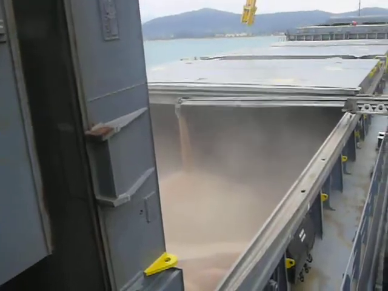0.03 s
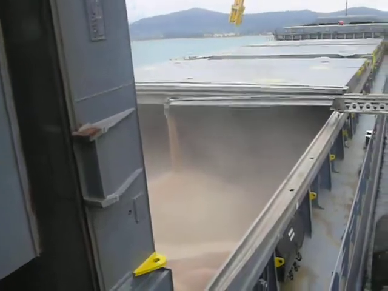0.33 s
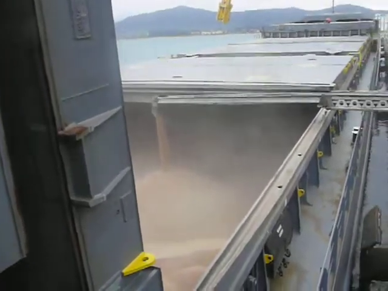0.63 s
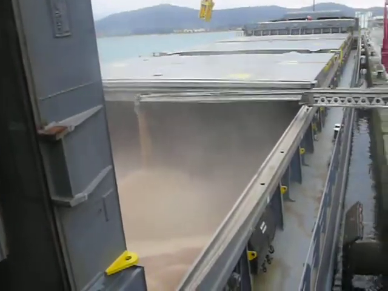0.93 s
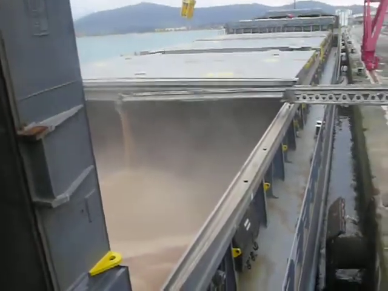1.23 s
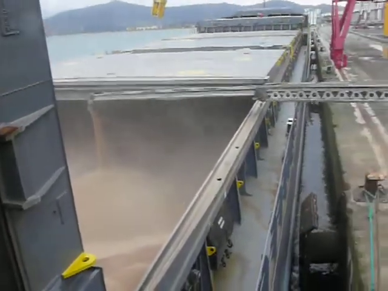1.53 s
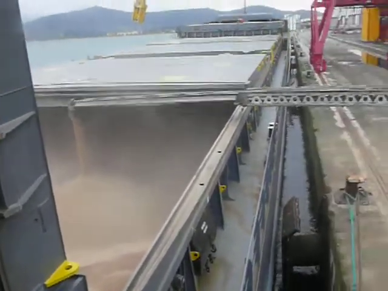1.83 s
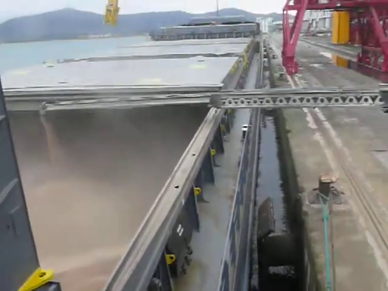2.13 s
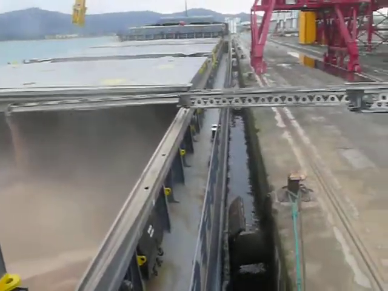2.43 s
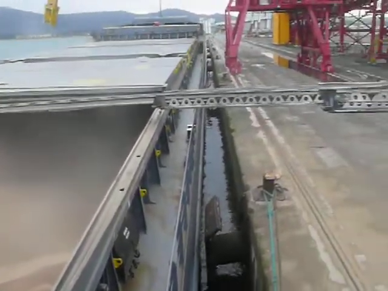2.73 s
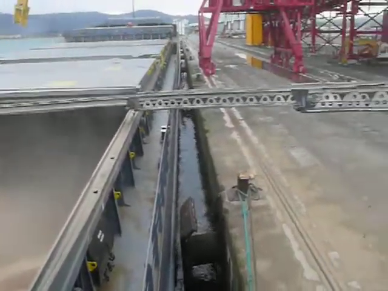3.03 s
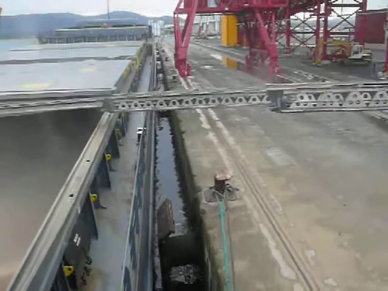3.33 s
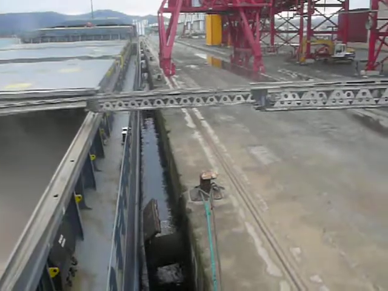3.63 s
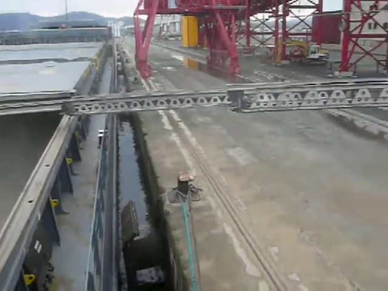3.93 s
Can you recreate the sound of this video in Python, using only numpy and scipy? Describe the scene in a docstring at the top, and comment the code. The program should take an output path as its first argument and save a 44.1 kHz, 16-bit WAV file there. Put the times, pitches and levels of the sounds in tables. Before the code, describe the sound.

Loud, continuous conveyor noise is heard from a ship's deck, with drive whines, a low engine drone and the hiss of falling grain. The balance of tones changes a little as the microphone turns from hold to quay.

```python
"""A conveyor pours grain into a ship's hold beside a quay, heard from the deck. The conveyor roars, its drives
whine and the engines hum steadily; thousands of kernel impacts a second merge into a dense hiss. Midway the
microphone turns from the deckhouse to the quay, which shifts the balance of the tones. The sound is mono and
narrow-band, with one faint click near the end."""
import sys
import numpy as np
from scipy import signal
from scipy.fft import rfft, irfft, next_fast_len
from scipy.io import wavfile
from scipy.ndimage import uniform_filter1d, map_coordinates

SR = 44100
rng = np.random.default_rng(int(sys.argv[2]) if len(sys.argv) > 2 else 0)


def generate_wav(sig):
    """Save sig (samples, or channels by samples) to the path in sys.argv[1] as 16-bit PCM at SR."""
    pcm = np.round(np.clip(np.atleast_2d(sig).T, -1, 1) * 32767).astype(np.int16)
    wavfile.write(sys.argv[1], SR, pcm)


N = 176400  # 4 s

# the microphone's turn: t/s, share of the turn (0 facing the deckhouse, 1 facing the quay)
MIC_TURN = [(0, 0), (1.8, .1), (2.2, .6), (2.8, 1), (4, 1)]


def amp(db):
    """Decibels to gain."""
    return 10 ** (np.asarray(db) / 20)


def unit(x):
    """Scale to rms 1."""
    return x / np.sqrt(np.mean(x ** 2) + 1e-20)


def curve(points):
    """One value per sample from (t/s, value) points."""
    return np.interp(np.arange(N) / SR, *np.transpose(points))


def wobble(rate):
    """A smooth random curve, rate knots a second."""
    return map_coordinates(rng.standard_normal(400), [np.arange(N) * rate / SR], mode="wrap")


def filtered(x, response):
    """Filter x by a gain given as a function of f/Hz."""
    size = next_fast_len(N + SR // 2)
    return irfft(rfft(x, size) * response(np.fft.rfftfreq(size, 1 / SR)), size)[:N]


def coloured(x, spectrum):
    """Shape x by (f/Hz, level/dB) points joined on a log frequency axis; the result has rms 1."""
    hz, db = np.transpose(spectrum)
    return unit(filtered(x, lambda f: amp(np.interp(np.log(f + 1), np.log(hz + 1), db))))


def patchy(x, depth_db):
    """Give x patches of random gain in time and frequency."""
    frames = signal.stft(x, nperseg=1024)[2]
    patches = uniform_filter1d(rng.standard_normal(frames.shape), size=9, axis=0)
    patches = uniform_filter1d(patches, size=10, axis=1)
    return signal.istft(frames * amp(depth_db * unit(patches)), nperseg=1024)[1][:N]


def tone(hz, drift_hz, waver_db, rate):
    """A sine of rms 1 whose pitch and level wander a little."""
    phase = 2 * np.pi * (np.cumsum(hz + drift_hz * wobble(rate)) / SR + rng.random())
    return unit(np.sin(phase) * amp(waver_db * wobble(rate)))


def engines():
    """Steadily running engines: a firm low drone and its octave among many weaker tones."""
    # main engine tones: f/Hz, rms level/dB, change as the microphone turns/dB
    drone_tones = [(70.5, -37.8, -1.5), (141.4, -40.5, 2)]
    # weaker hum of engines and motors: f/Hz, rms level/dB
    hum_tones = [(90.1, -55), (105.8, -50), (115.4, -48.5), (119.6, -55.5), (135.2, -50), (151.6, -58.5),
                 (166.9, -53.5), (176.2, -50.5), (189.2, -52.5), (231.3, -46.5), (256, -45), (305.4, -46),
                 (334, -49.5), (380.8, -43.5)]
    drone = sum(amp(db + turn_db * curve(MIC_TURN)) * tone(hz, drift_hz=.12, waver_db=.3, rate=4)
                for hz, db, turn_db in drone_tones)
    hum = sum(amp(db) * tone(hz, drift_hz=.3, waver_db=1, rate=3) for hz, db in hum_tones)
    return drone + hum


def conveyor(roar_db=-23.4):
    """The conveyor roars broadly and its drives whine in narrow noise bands; both swell together."""
    # roar of the conveyor and the hold: f/Hz, relative level/dB
    roar_spectrum = [(25, -33), (48, -30), (66, -16.5), (84, -24), (110, -16), (152, -12), (178, -6),
                     (265, -3), (315, 0), (352, -1.5), (440, -1.5), (505, -3), (555, -2.5), (610, 0),
                     (750, 0), (845, -4), (910, -1), (965, -3.5), (1020, -1.5), (1170, -6.5), (1310, -3),
                     (1500, -9.5), (1900, -12), (3000, -24.5), (4500, -57)]
    # drive whines: f/Hz, half-width/Hz, rms level before the swell/dB, change as the microphone turns/dB
    drive_whines = [(312, 10, -43, 0), (460, 5.5, -39.5, -1), (585, 6, -44, 0), (622.5, 3, -42, 0),
                    (712, 6, -45.5, -1), (755, 8, -44, -2), (915, 8, -43, 0), (1030, 20, -45, 3),
                    (1243, 3.5, -39.5, -4), (1605, 10, -49, 0), (1893, 8, -48, -1), (2030, 20, -47, 0),
                    (2175, 2.5, -46.5, -1), (2560, 22, -46, 0)]
    # slow swell of the machinery: t/s, level/dB
    swell = [(0, -.1), (.3, .2), (.95, -.8), (1.25, .6), (1.8, .5), (2.4, -.2), (2.85, -0.1), (3.1, .3),
             (3.5, -.1), (4, -.3)]
    roar = coloured(patchy(rng.standard_normal(N), depth_db=.4), roar_spectrum)
    whine = np.zeros(N)
    for hz, half_width, db, turn_db in drive_whines:
        band = filtered(rng.standard_normal(N), lambda f: 1 / (1 + ((f - hz) / half_width) ** 2))
        whine += amp(db + turn_db * curve(MIC_TURN)) * unit(band)
    return amp(curve(swell)) * (amp(roar_db) * roar + whine)


def falling_grain(level_db=-29.2, kernels_per_s=30000, spread_db=1.5, flutter_db=.27):
    """Kernels land in the hold; their impacts merge into a hiss that wavers slightly with the flow."""
    # hiss of the falling grain: f/Hz, relative level/dB
    hiss_spectrum = [(300, -30), (1000, -10.5), (1600, -3), (1930, -4), (2040, 2), (2150, -3), (2350, 0),
                     (2560, -1), (2660, -3), (2900, -6.5), (3200, -6.5), (3500, -10.5), (3900, -20),
                     (4200, -29.5), (4500, -48)]
    strengths = rng.standard_normal(N) * amp(spread_db * rng.standard_normal(N))
    impacts = strengths * (rng.random(N) < kernels_per_s / SR)
    hiss = coloured(impacts, hiss_spectrum)
    return amp(level_db + flutter_db * wobble(rate=5)) * hiss


def click(at_s=3.4233, level_db=-14.5, decay_s=.0008):
    """One tiny dry click: a sudden step that relaxes at once."""
    age = np.arange(N) / SR - at_s
    return -amp(level_db) * (age >= 0) * np.exp(-np.abs(age) / decay_s)


def scene():
    """Engines, conveyor and grain at one microphone on deck."""
    return (engines() + conveyor() + falling_grain())[None]


def record(dry):
    """The recorder passes a narrow band and adds a small constant offset; only the click reaches higher."""
    band_top_hz, click_top_hz, offset = 4550, 15900, -.0238
    narrow = filtered(dry[0], lambda f: np.clip((band_top_hz - f) / 80, 0, 1))
    tick = filtered(click(), lambda f: np.clip((click_top_hz - f) / 200, 0, 1))
    return (narrow + tick + offset)[None]


dry = scene()
out = record(dry)
generate_wav(out)
```